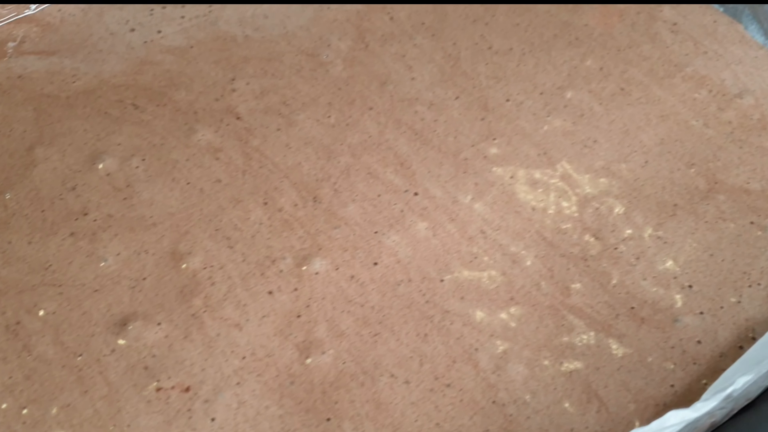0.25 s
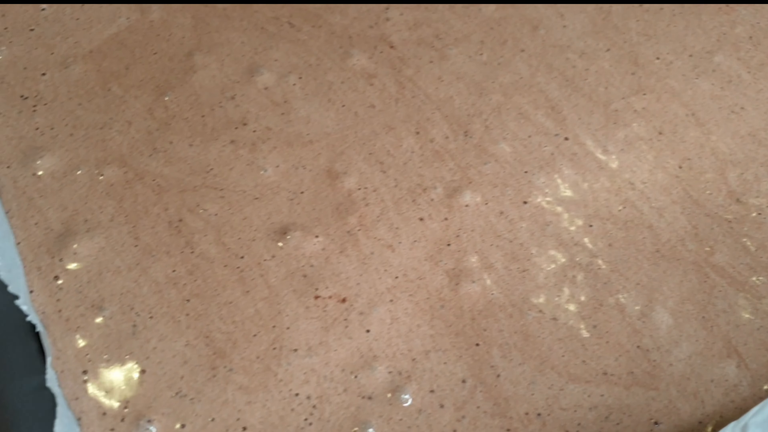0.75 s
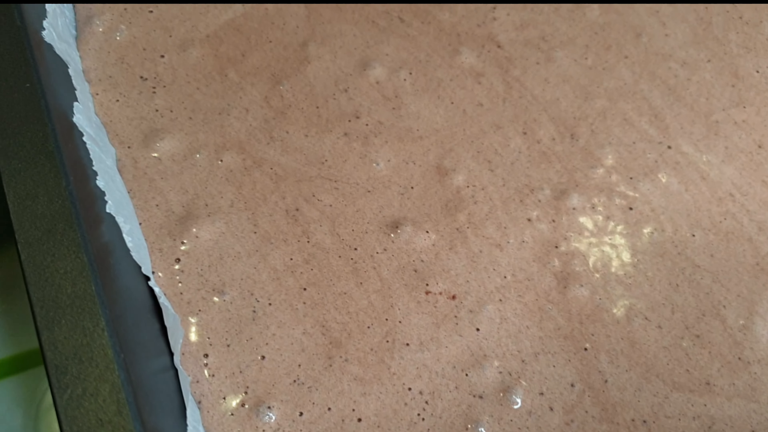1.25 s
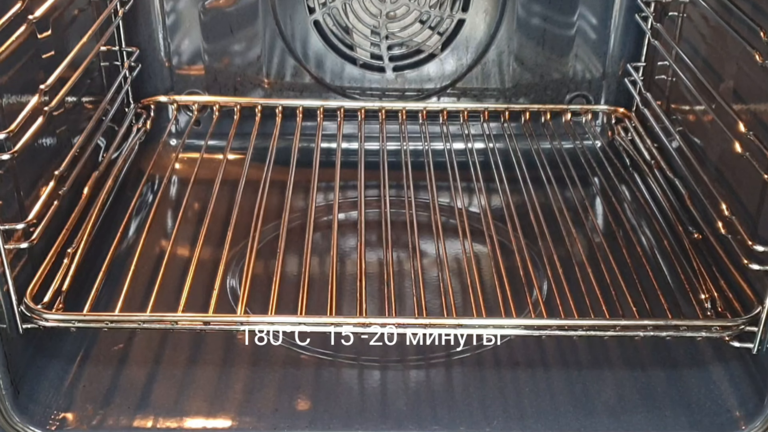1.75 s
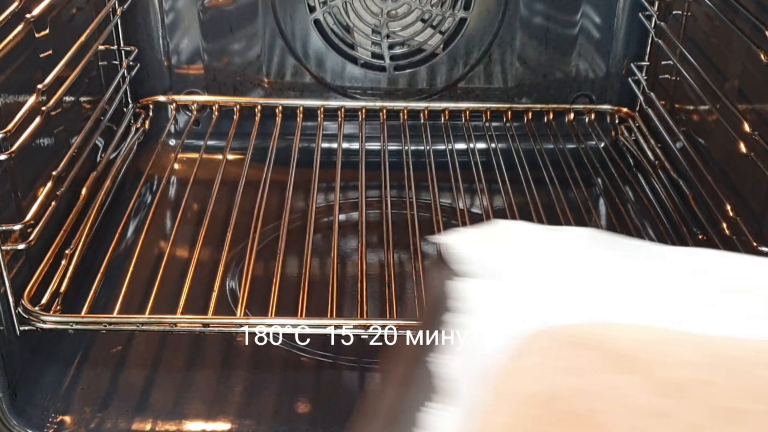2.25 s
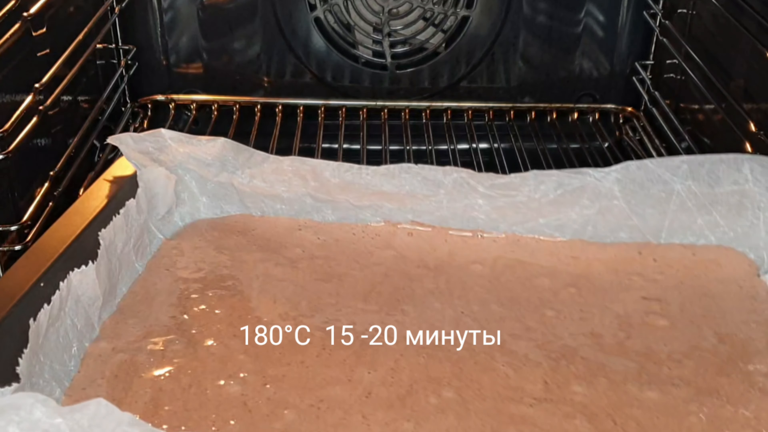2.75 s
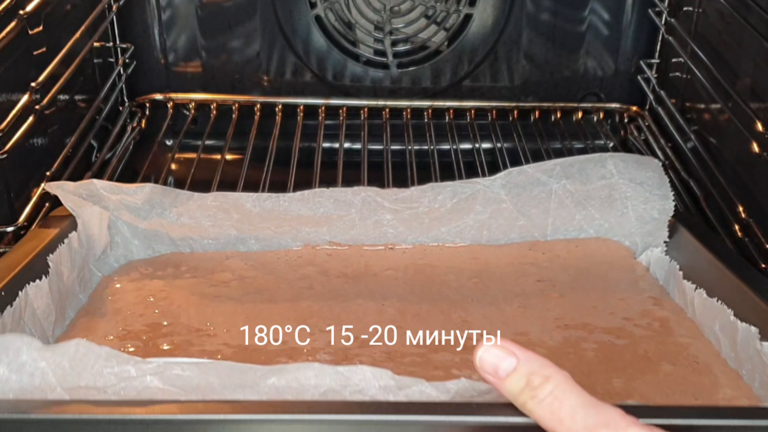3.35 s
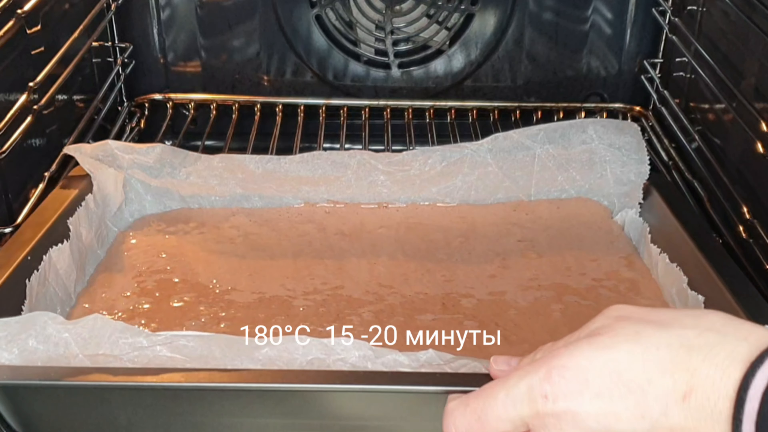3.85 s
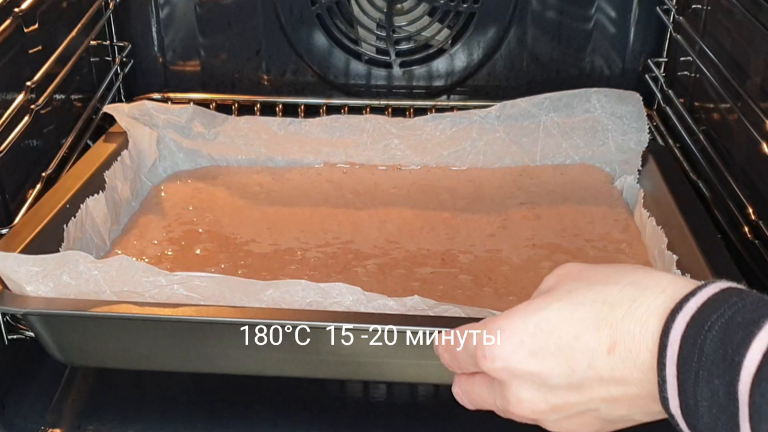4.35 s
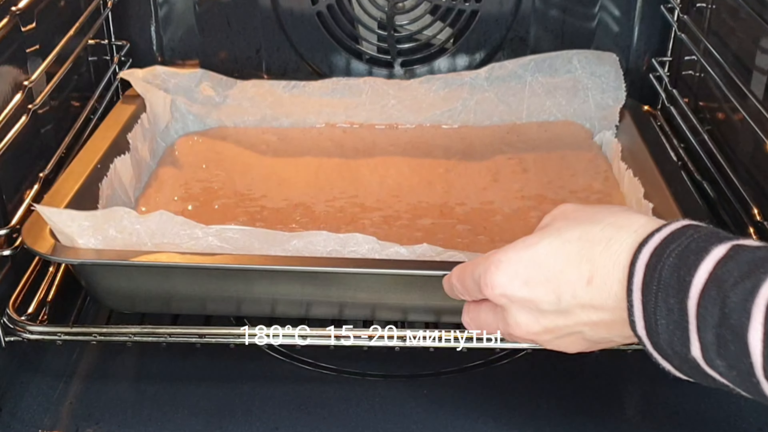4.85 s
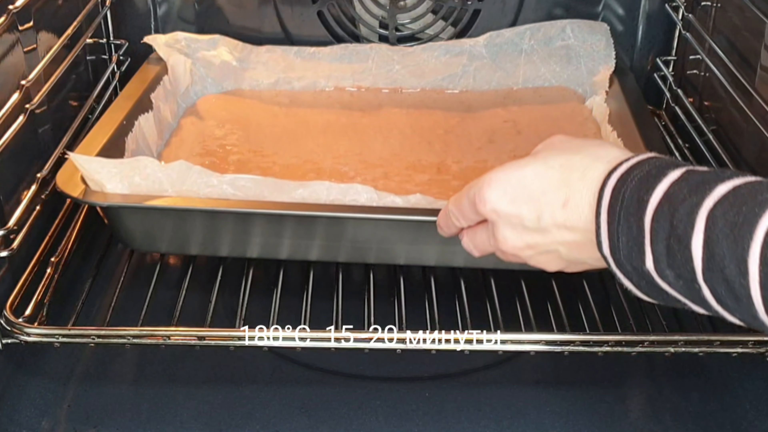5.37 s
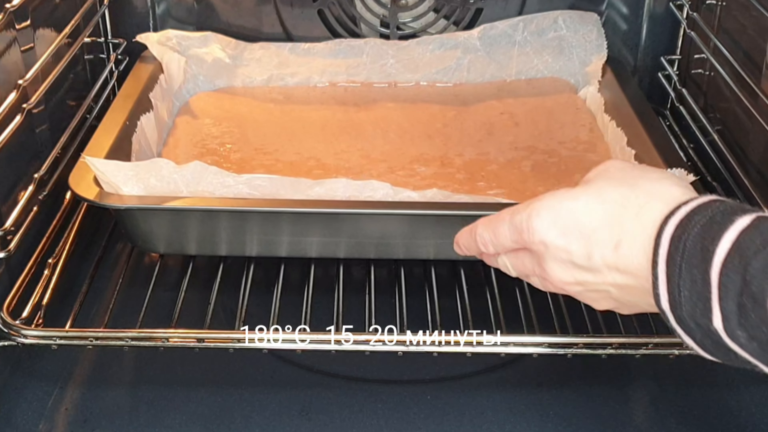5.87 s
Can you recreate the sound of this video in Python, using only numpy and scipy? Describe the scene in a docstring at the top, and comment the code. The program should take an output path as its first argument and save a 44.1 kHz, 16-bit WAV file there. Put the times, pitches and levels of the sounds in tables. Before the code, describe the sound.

Faint room rumble dips to silence, then paper brushes, a loaded baking pan bangs and rattles on oven wires, grinds inward and bumps to a stop.

```python
"""A paper-lined metal tray of batter is set on an oven's wire rack: blows excite decaying modes of pan and rack.
The lining brushes in as filtered noise, a sharp knock and rattle follow as the rear edge settles, and
stick-slip friction scrapes the pan along the wires until it bumps to a stop, with low booms as it rocks.
Before it, a quiet kitchen of shaped noise, soft bumps, a rustle and a faint appliance whine of sine pairs
dips to silence; the sound returns at an open oven with mains hum and a rush of air."""
import sys
import numpy as np
from scipy import signal
from scipy.fft import rfft, irfft, next_fast_len
from scipy.io import wavfile
from scipy.ndimage import uniform_filter1d

SR = 44100
rng = np.random.default_rng(int(sys.argv[2]) if len(sys.argv) > 2 else 0)


def put_to_file(sound):
    """Save the sound as 16-bit audio at rate SR, in the file named by the first command-line argument."""
    columns = np.atleast_2d(sound).T  # one column per channel
    safe = np.clip(columns, -1, 1)
    whole_steps = np.round(safe * 32767)
    wavfile.write(sys.argv[1], SR, whole_steps.astype(np.int16))


N = 269451
TIME = np.arange(N) / SR  # s
SILENCE_S = 1.782  # the kitchen has faded out and the oven starts to fade in


def amp(db):
    """Level law: decibels to amplitude gain."""
    return 10 ** (np.asarray(db) / 20)


def unit(x):
    """Normalization: scales to rms 1."""
    return x / np.sqrt(np.mean(x ** 2) + 1e-20)


def read(points, hz):
    """Spectral interpolation: a table's value at hz, on a log-frequency axis."""
    table_hz, value = np.transpose(points)
    return np.interp(np.log(hz + 1), np.log(table_hz + 1), value)


def shape(x, db_at):
    """Linear filtering: multiplies the spectrum by a rule from Hz to dB."""
    size = next_fast_len(x.shape[-1] + 2048)
    gain = amp(db_at(np.fft.rfftfreq(size, 1 / SR)))
    return irfft(rfft(x, size) * gain, size)[..., :x.shape[-1]]


def lift(modes, hz):
    """Resonance: the dB that a few bell-shaped peaks add to a spectrum."""
    return sum(db / (1 + (2 * (hz - centre) / width) ** 2) for centre, width, db in modes)


# likeness of the two channels: pitch_hz, correlation
CHANNEL_CORRELATION = [(30, .75), (70, .97), (190, .96), (280, .75), (650, .68), (1100, .25), (2200, 0),
                       (16000, 0)]


def port_noise(size):
    """Spatial coherence: two channels of white noise, alike in the bass and unrelated in the treble."""
    common, apart = rfft(rng.standard_normal((2, size)))
    alike = np.clip(read(CHANNEL_CORRELATION, np.fft.rfftfreq(size, 1 / SR)), -.99, .99)
    mid = common * np.sqrt((1 + alike) / 2)
    side = apart * np.sqrt((1 - alike) / 2)
    return irfft(np.array([mid + side, mid - side]), size)


def wander(knots_per_s):
    """Random modulation: straight lines between random values, scaled to rms 1."""
    knots = rng.standard_normal(4096)
    return unit(np.interp(TIME * knots_per_s, np.arange(len(knots)), knots))


def held(start, length, attack_s, release_s):
    """Envelope: a straight rise, a hold, and an exponential decay after the length."""
    attack = np.clip((TIME - start) / attack_s, 0, 1)
    return attack * np.exp(-np.maximum(TIME - start - length, 0) / release_s)


def arch(start, length):
    """Stroke envelope: a half sine broadened by a power, swelling and easing."""
    half_sine = np.sin(np.pi * np.clip((TIME - start) / length, 0, 1))
    return np.maximum(half_sine, 0) ** 0.5


def swell(peak_s, width_s, rise_db):
    """Envelope: gain 1 with one smooth Gaussian rise in dB."""
    return amp(rise_db * np.exp(-((TIME - peak_s) / width_s) ** 2))


def fades():
    """Envelopes: the gain of the kitchen going out and that of the oven coming in."""
    fade_out_s, fade_in_s = 0.095, 0.17
    kitchen_gain = np.clip((SILENCE_S - TIME) / fade_out_s, 0, 1)
    oven_gain = np.clip((TIME - SILENCE_S) / fade_in_s, 0, 1) ** 2.06
    return kitchen_gain, oven_gain


def tones(lines, waver_db):
    """Line spectrum: sines of fixed pitch, each wavering in level."""
    out = 0
    for hz, db in lines:
        level = np.sqrt(2) * amp(db + waver_db * wander(3.2))
        out = out + level * np.sin(2 * np.pi * (hz * TIME + rng.random()))
    return out


# ring of the oven cavity: pitch_hz, t60_s
CAVITY_DECAY = [(60, 0.42), (200, 0.66), (500, 0.39), (1500, 0.43), (3000, 0.38), (6000, 0.26),
                (12000, .21)]


def cavity(noise, crack_db, crack_s, build_cycles):
    """Reverberation: a dense first burst, then a ring; each band builds and dies at its own speed."""
    size = noise.shape[-1]
    t, hz, spectrum = np.arange(size) / SR, np.fft.rfftfreq(size, 1 / SR), rfft(noise)
    crack = amp(crack_db) * np.exp(-t / crack_s)
    centres = np.geomspace(60, 15000, 9)  # band centres, Hz
    out = 0
    for centre, share in zip(centres, np.eye(len(centres))):
        # overlapping bands that add up to the whole noise
        band = irfft(spectrum * np.interp(np.log(hz + 1), np.log(centres), share), size)
        rise = 1 - np.exp(-t / (build_cycles / centre + 0.00081))
        decay = amp(-60 * t / read(CAVITY_DECAY, centre))
        out = out + band * rise * (decay + crack)
    return out


def friction(gain, db_at, smooth, patchy_db, echo_db, slips_per_s=450, streak_db=2.0):
    """Stick-slip friction: uneven tiny slips over a smooth rub, of shifting colour, direct and off the walls."""
    slips = (rng.random(N) < slips_per_s / SR) * np.sqrt(rng.exponential(1, N))
    grain = unit(signal.lfilter([1], [1, -np.exp(-1 / (0.0022 * SR))], slips))  # each slip dies in 2.2 ms
    hz, t, z = signal.stft(port_noise(N) * (grain + smooth), SR, nperseg=1024, noverlap=768)
    hz = hz[:, None]

    def blotches(bins, frames):
        field = rng.standard_normal(z.shape[1:])
        return unit(uniform_filter1d(uniform_filter1d(field, size=bins, axis=0), size=frames, axis=1))

    # patches are broad and brief; streaks are narrow and ring longer
    shift_db = patchy_db * blotches(24, 5) + streak_db * blotches(2, 14)
    shift_db = shift_db * np.minimum(hz / 1100, 1)  # the colour shifts less below 1100 Hz
    z = z * amp(db_at(hz, t) + shift_db)
    rub = gain * unit(signal.istft(z, SR, nperseg=1024, noverlap=768)[1][:, :N])
    walls = cavity(port_noise(SR // 2), crack_db=-14.0, crack_s=0.0073, build_cycles=0.89)
    echo = signal.fftconvolve(rub, walls / np.linalg.norm(walls[0]), axes=1)[:, :N]
    return rub + amp(echo_db) * echo


# spectrum of the room air: pitch_hz, density_db (relative, per Hz)
KITCHEN_SPECTRUM = [(15, -58), (25, -55), (53, -5), (97, -7.5), (130, -4.5), (200, -10.5), (363, -11),
                    (416, -14.5), (962, -25.5), (1940, -27), (2280, -23), (2910, -29.5), (7920, -39),
                    (14800, -28.5), (16000, -58)]
# drones of the room: pitch_hz, width_hz, lift_db
KITCHEN_MODES = [(134.4, 16, 7.5), (279, 11, 6.5), (351, 30, 6.5)]


def kitchen(air_db=-66, rumble_db=-2, hiss_db=-4, lumpy_db=1.55):
    """Shaped noise: room rumble of uneven level under steady hiss, with bumps and a rustle."""
    def colour_db(hz):
        return read(KITCHEN_SPECTRUM, hz) + lift(KITCHEN_MODES, hz)

    air = amp(air_db) * unit(shape(port_noise(N), colour_db))  # level before the trims below
    rumble = shape(air, lambda hz: read([(600, 0), (1500, -30)], hz))
    hiss = air - rumble
    low = rumble * amp(rumble_db + lumpy_db * wander(13.6)) + bumps()
    balance = amp([[-1.2], [.8]])  # left, right
    return (low * balance + amp(hiss_db) * hiss + rustle()) * fades()[0]


# the whine's lower pair of lines: pitch_hz, level_db (relative)
LOWER_WHINE = [(2218, -84), (2266, -84.5)]
# the whine's upper pair of lines: pitch_hz, level_db (relative)
UPPER_WHINE = [(2412, -84), (2460, -88.5)]


def whine(lower_db=-7, upper_db=-17, recede_db_per_s=34):
    """Beating: an appliance's two close pairs; the upper swells, then the lower twice; they recede at the oven."""
    lower = amp(lower_db) * tones(LOWER_WHINE, waver_db=-1)
    lower = lower * swell(peak_s=0.51, width_s=0.35, rise_db=9.5)
    lower = lower * swell(peak_s=1.75, width_s=0.18, rise_db=6.5)
    upper = amp(upper_db) * tones(UPPER_WHINE, waver_db=1.5)
    upper = upper * swell(peak_s=.2, width_s=0.51, rise_db=19.5)
    recede = amp(-recede_db_per_s * np.maximum(TIME - SILENCE_S, 0))
    balance = amp([[-5], [3]])  # left, right
    return (lower + upper) * sum(fades()) * recede * balance


# soft low bumps in the kitchen: start_s, level_db (before envelope and balance), upper_edge_hz
BUMPS = [(0.621, -59, 540), (.745, -63.5, 130), (1.021, -60, 334), (1.09, -77, 190), (1.305, -61.5, 127),
         (1.41, -70, 140), (1.635, -63.5, 330), (1.728, -56.5, 89)]


def bumps(slope_db_per_octave=13):
    """Low-pass filtering: dull bumps in the colour of the room, each falling off above its own edge."""
    attack_s, release_s = 0.012, 0.063
    noise = shape(port_noise(N), lambda hz: read(KITCHEN_SPECTRUM, hz))
    out = 0
    for s, db, edge_hz in BUMPS:
        dull = unit(shape(noise, lambda hz: -slope_db_per_octave * np.log2(np.maximum(hz / edge_hz, 1))))
        out = out + amp(db) * held(s, attack_s, attack_s, release_s) * dull
    return out


# spectrum of the rustle: pitch_hz, density_db (relative, per Hz)
RUSTLE_SPECTRUM = [(500, 5), (2050, -8), (2290, 13.5), (2550, -6), (3500, -11.5), (5200, -8), (9000, -28)]


def rustle(start_s=0.777, length_s=0.17, level_db=-72.5):
    """Friction noise: one faint stroke in the kitchen."""
    return friction(amp(level_db) * arch(start_s, length_s), lambda hz, t: read(RUSTLE_SPECTRUM, hz),
                    smooth=3.0, patchy_db=2.0, echo_db=-6)


# spectrum of the oven's rush: pitch_hz, density_db (relative, per Hz)
OVEN_SPECTRUM = [(25, -28), (55, -7.5), (110, -4), (200, -8.5), (380, -17), (600, -20.5), (800, -29.5),
                 (1000, -33.5), (1500, -39.5), (3400, -44.5), (8000, -49.5), (11500, -45.5), (16000, -53.5)]
# the cavity colours its rush: pitch_hz, width_hz, lift_db
OVEN_MODES = [(825, 48, 8.5), (2300, 120, 12)]
# mains hum: pitch_hz, level_db (before fade, swell and balance)
MAINS = [(100, -73.5), (200, -79.5), (300, -91.5)]


def oven(rush_db=-70.5):
    """Harmonic hum and resonantly coloured noise: mains and a soft rush of air, louder once the tray is in."""
    def colour_db(hz):
        return read(OVEN_SPECTRUM, hz) + lift(OVEN_MODES, hz)

    rush = amp(rush_db) * unit(shape(port_noise(N), colour_db))
    hum = tones(MAINS, waver_db=0.5)
    balance = amp([[-.7], [.7]])  # left, right
    return (rush + hum) * fades()[1] * swell(peak_s=5.7, width_s=0.73, rise_db=3.5) * balance


def ring(modes, colour_db):
    """Modal decay: struck sines die exponentially; the higher ones reach the channels out of step."""
    t, out = np.arange(SR) / SR, 0
    for k, (hz, db, t60) in enumerate(modes):
        apart = (-1) ** k * np.arccos(np.clip(read(CHANNEL_CORRELATION, hz), -1, 1)) / 2
        phase = k * np.pi + np.array([[apart], [-apart]])
        out = out + amp(db + colour_db(hz) - 60 * t / t60) * np.sin(2 * np.pi * hz * t + phase)
    return out * (1 - np.exp(-t / 0.00059))  # soft onset


# knocks of the pan: start_s, strength_db (relative), thump_db (loaded pan), treble_db (contact),
# rack_share (part of the ring in the rack, 0-1)
KNOCKS = [(2.053, -65.5, -27, 2, 0.6), (2.44, -61, -13, 11, 0.2), (2.504, -51.5, -7.5, 9.5, 0.45),
          (2.521, -22.5, -0.5, -2, 0.12), (2.551, -40.5, 10, 2, 0), (3.198, -49.5, -6, -9.5, 0),
          (3.214, -44, 11.5, -12, 0.47), (3.348, -51, -13, 0, 0.3), (3.383, -44.5, -21, -13, 0.37),
          (3.4079, -45.5, -17, 1, 0.42), (3.449, -49, -10, 2.5, 0.53), (3.498, -52, -9, 1.5, 0),
          (3.689, -57, 19, -6, 0.52), (3.703, -54, -4, -42, 0.15), (5.534, -37, -5.5, -14, 0.83),
          (5.566, -50, 0, -10.5, 0.14), (5.655, -53, -12, -23, 0.3)]
# spectrum of a blow on the pan: pitch_hz, density_db (relative, per Hz)
BLOW_SPECTRUM = [(25, -43.5), (55, -9.5), (90, -2), (165, -6), (250, -2.5), (480, -4.5), (660, -2.5),
                 (840, -6), (1100, -6), (2500, -8), (4500, -16), (7500, -18), (10500, -14), (16000, -27)]
# what the pan rings with: pitch_hz, level_db (relative), t60_s
PAN_MODES = [(100, -11, .5), (133, -11, .5), (232, -5, .47), (257, -9, .4), (360, 0, .35), (393, 2, .33),
             (431, -4, .4), (538, 1, .34), (580, -7, .3), (617, 2, .3), (650, -2, .3), (704, -2, .3),
             (750, -24.5, 1.15), (888, -1, .3), (926, -2, .3), (1048, 1, .35), (1087, -10, .5),
             (1195, -6, .32), (1330, -7, .3), (1547, -4, .25), (1707, -8, .35), (1899, -4, .25),
             (2205, -6, .25), (2700, -6, .27), (2960, -12, .35), (3275, -7, .26), (3884, -8, .26)]
# what the wire rack rings with: pitch_hz, level_db (relative), t60_s
RACK_MODES = [(199, -8, .5), (413, 0, .6), (431, 0, .65), (931, 1, .5), (955, 0, .22), (1065, 4, .13),
              (1350, 6, .09), (1437, -8, .3), (1635, 3, .12), (2466, -2, .3), (2560, 4, .09),
              (2765, 0, .22), (2880, 0, .07)]


def knocks(ring_db=-13.0, wash_db=-6, rack_wash_db=-5):
    """Impact excitation: blows crack, ring pan and rack and fill the oven; each knock has its own thump and
    treble."""
    out = np.zeros((2, N + SR))
    for s, db, thump_db, treble_db, rack_share in KNOCKS:
        def colour_db(hz):
            return read([(110, thump_db), (350, 0.017), (1300, 0), (8000, treble_db)], hz)

        share = np.clip(rack_share, 0, 1)
        blow = unit(shape(port_noise(SR), lambda hz: read(BLOW_SPECTRUM, hz)))
        wash = cavity(shape(blow, colour_db), crack_db=7.5, crack_s=0.0067, build_cycles=1.0)
        metal = (1 - share) * ring(PAN_MODES, colour_db) + share * ring(RACK_MODES, colour_db)
        start = round(s * SR)
        knock = amp(wash_db + share * rack_wash_db) * wash + amp(ring_db) * metal
        out[:, start:start + SR] += amp(db) * knock
    return out[:, :N]


# the lining paper brushes the oven: start_s, length_s, level_db (of the direct rub, before the lean)
BRUSHES = [(2.067, 0.043, -79.5), (2.11, .055, -83), (2.263, .091, -50.5), (2.339, .009, -48.5),
           (2.445, .047, -70), (2.472, .012, -60.5)]
# spectrum of the paper: pitch_hz, density_db (relative, per Hz)
PAPER_SPECTRUM = [(200, -25), (700, -14.5), (1250, -11.5), (1750, -10.5), (2400, -5.5), (3200, -7.5),
                  (4300, -1), (6000, -6), (8500, -6.5), (10500, -3.5), (14500, -7.5), (16000, -10.5)]


def paper(attack_s=0.0037, release_s=0.0068):
    """Friction noise: the stiff lining brushes past as the tray goes in."""
    contact = sum(amp(db) * held(s, length, attack_s, release_s) for s, length, db in BRUSHES)
    return friction(contact, lambda hz, t: read(PAPER_SPECTRUM, hz),
                    smooth=1.8, patchy_db=0.4, echo_db=-8.0, streak_db=0.0)


# the heavy pan rocks on the wires: start_s, level_db (before envelope and lean)
ROCKS = [(2.522, -48.5), (3.212, -51), (3.41, -54), (3.585, -67), (5.551, -56)]


def boom(attack_s=0.035, release_s=0.091):
    """Low-frequency radiation: each time the loaded pan rocks, its base booms and dies away."""
    gain = sum(amp(db) * held(s, attack_s, attack_s, release_s) for s, db in ROCKS)
    spectrum = [(25, -35), (50, -9.5), (90, 3), (160, -4), (260, -10), (700, -38)]  # Hz, dB
    return gain * unit(shape(port_noise(N), lambda hz: read(spectrum, hz)))


# pushes along the wires, in the order of their middles:
# start_s, length_s, grind_db, hiss_db (both before unsteadiness and lean), contact_resonance_hz
PUSHES = [(3.445, 0.31, -70.5, -71.5, 1110), (3.704, 0.49, -64.5, -64, 1340),
          (4.066, 0.059, -84, -64.5, 1330), (4.12, 0.37, -71, -76, 1320), (4.31, 0.65, -66, -66, 1700),
          (4.833, 0.083, -61, -86, 990), (4.992, 0.039, -62.5, -64, 1290), (5.21, .065, -70, -82, 830),
          (4.863, 0.83, -70, -70.5, 1000), (5.705, 0.061, -74.5, -77, 1020)]
# spectrum of the grinding: pitch_hz, density_db (relative, per Hz)
GRIND_SPECTRUM = [(130, -32), (225, 8), (320, -22.5), (430, 2.5), (700, -4.5), (920, -2.5), (1250, -5),
                  (2000, -4.5), (3000, -6), (4500, -22), (8000, -26)]
# spectrum of the hiss: pitch_hz, density_db (relative, per Hz)
HISS_SPECTRUM = [(1500, 2), (3300, -5.5), (5000, -4), (7500, -6.5), (10500, -1.5), (13000, -5.5),
                 (16000, -18)]
# fixed resonances under the slide, of the rack and of a steady contact tone: pitch_hz, width_hz, lift_db
SLIDE_MODES = [(418.4, 31, 11.5), (485, 50, -3.5), (852, 60, 2.5), (1120, 26, 8.5), (1184, 46, 5),
               (1760, 23, 3.5), (2600, 16, -1.5), (2950, 52, 4.5)]


def slide(contact_db=5, contact_octaves=0.37, unsteady_db=.5):
    """Friction-driven resonance: the base grinds over the wires; one peak follows the contact, others stay fixed."""
    starts, lengths, grind_db, hiss_db, contact_hz = np.transpose(PUSHES)
    strokes = np.array([arch(s, length) for s, length in zip(starts, lengths)])
    speeds = strokes * amp(unsteady_db * wander(21.9))

    def grind_colour(hz, t):
        contact_now_hz = np.interp(t, starts + lengths / 2, contact_hz)
        octaves = np.log2((hz + 1) / contact_now_hz)
        contact_peak = contact_db * np.exp(-(octaves / contact_octaves) ** 2)
        return read(GRIND_SPECTRUM, hz) + lift(SLIDE_MODES, hz) + contact_peak

    def pushed(db):
        # overlapping pushes add in power
        return np.linalg.norm(amp(db)[:, None] * speeds, axis=0)

    grind = friction(pushed(grind_db), grind_colour, smooth=1.3, patchy_db=1.8, echo_db=-2, streak_db=3.0)
    hiss = friction(pushed(hiss_db), lambda hz, t: read(HISS_SPECTRUM, hz),
                    smooth=5.8, patchy_db=1.0, echo_db=-4.5)
    return grind + hiss + catches(pushed(grind_db))


def catches(gain, catches_per_s=50, level_db=-2.5, damping_db_per_s=260):
    """Damped modal ringing: tiny catches on the wires each ring one middle mode of rack or pan, damped by the load."""
    modes = [mode for mode in RACK_MODES + PAN_MODES if 800 < mode[0] < 3000]
    t, out = np.arange(SR // 2) / SR, np.zeros((2, N))
    chance, size, which = rng.random((3, N))
    clicks = gain * size * (chance < catches_per_s / SR)
    chosen = np.floor(which * len(modes))
    for k, (hz, _, t60) in enumerate(modes):
        decay = amp(-(60 / t60 + damping_db_per_s) * t)
        ping = decay * np.sin(2 * np.pi * (hz * t + rng.random((2, 1))))
        out += signal.oaconvolve((clicks * (chosen == k))[None], ping, axes=1)[:, :N]
    return amp(level_db) * out


# the tray's sounds lean mostly right: pitch_hz, left_minus_right_db
LEAN = [(100, -0.9), (390, -2.5), (630, -2), (1000, -2.5), (2400, -5.5), (3300, -2.5), (4500, -13),
        (6800, -9), (8600, 2), (11000, 1.5), (15000, -1)]


def scene():
    """Superposition: the tray, leaning by level difference, over first the kitchen and then the oven."""
    background = kitchen() + whine() + oven()
    left, right = knocks() + paper() + boom() + slide()
    left = shape(left, lambda hz: read(LEAN, hz) / 2)
    right = shape(right, lambda hz: -read(LEAN, hz) / 2)
    return background + np.array([left, right])


def record(dry, edge_hz=15800):
    """Band limiting: a linear-phase low-pass filter removes the top of the treble."""
    lowpass = signal.firwin(511, edge_hz, window=("kaiser", 9), fs=SR)
    return signal.oaconvolve(dry, lowpass[None], "same")


dry = scene()
out = record(dry)
put_to_file(out)
```